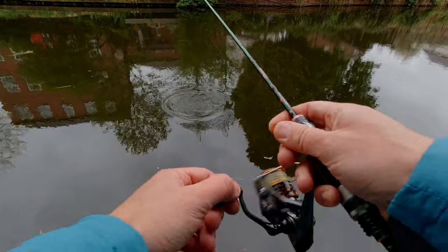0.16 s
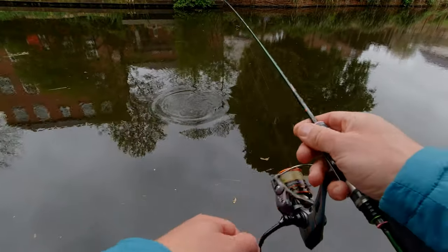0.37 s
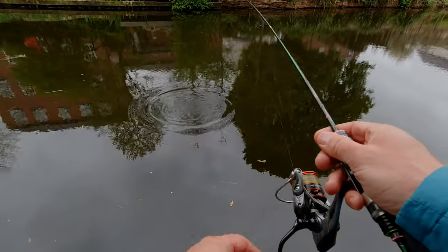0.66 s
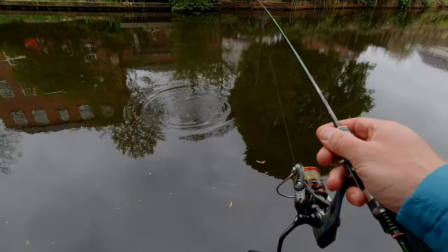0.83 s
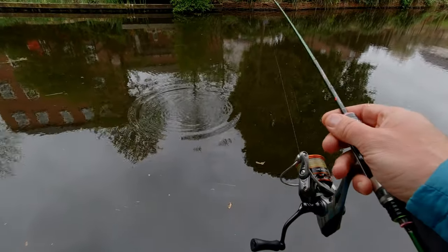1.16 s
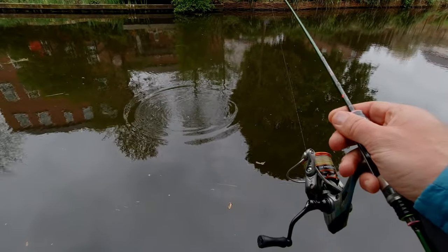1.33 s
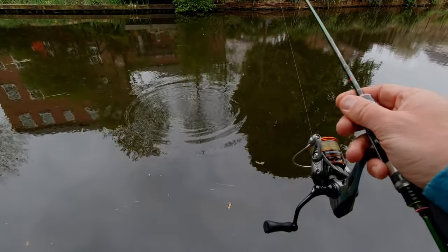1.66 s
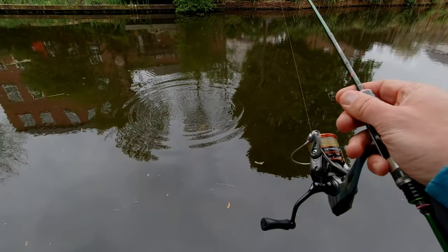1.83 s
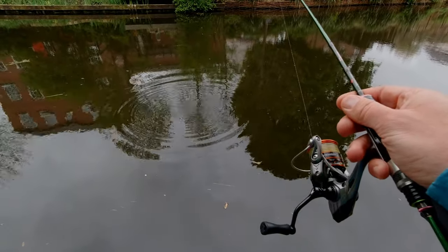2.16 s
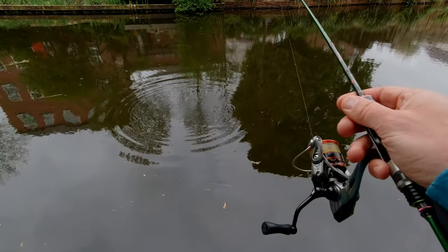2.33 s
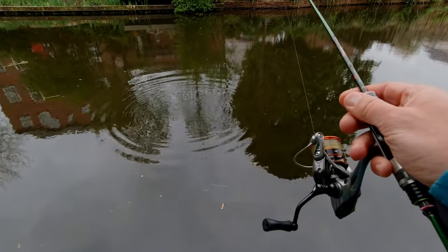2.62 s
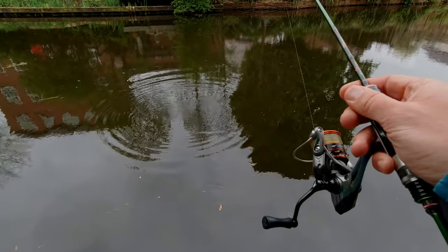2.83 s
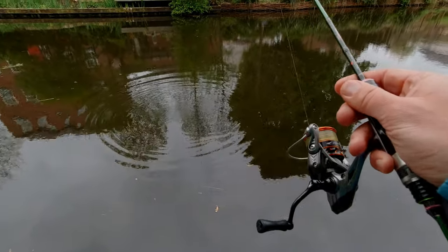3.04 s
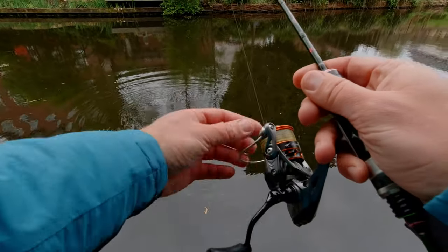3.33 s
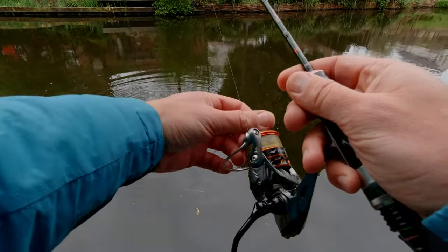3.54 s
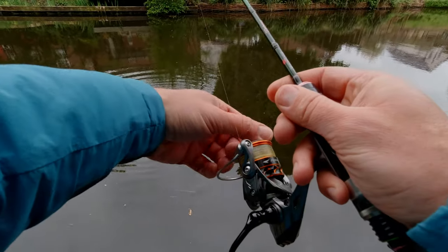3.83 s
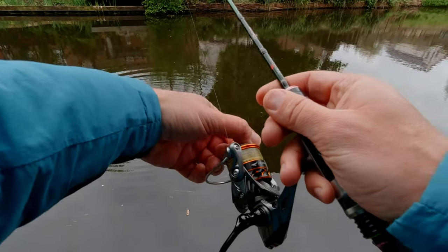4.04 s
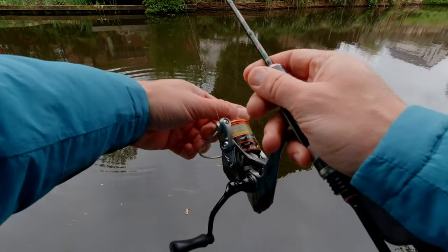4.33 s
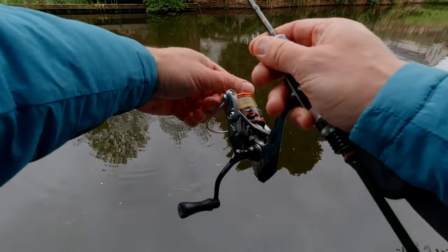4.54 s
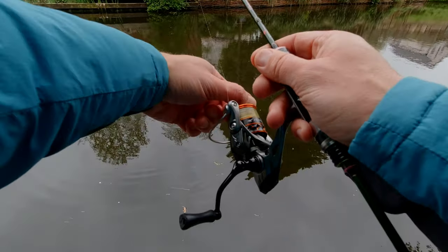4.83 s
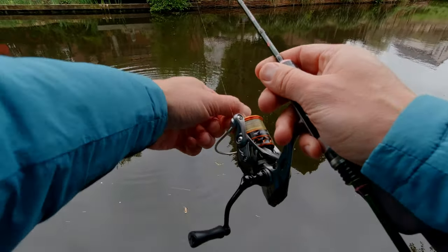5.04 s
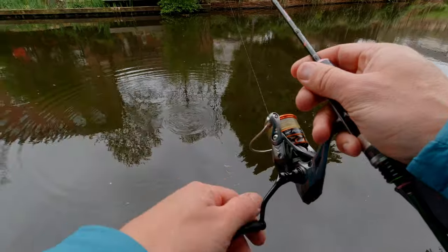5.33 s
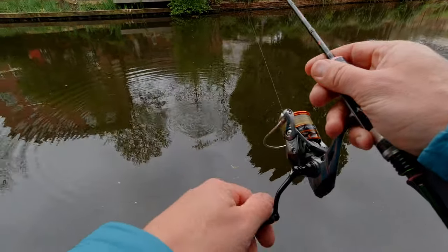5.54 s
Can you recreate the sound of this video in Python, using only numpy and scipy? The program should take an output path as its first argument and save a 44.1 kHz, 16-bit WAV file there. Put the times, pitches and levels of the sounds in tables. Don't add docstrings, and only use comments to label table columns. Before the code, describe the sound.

Bright reel clicks buzz briefly, then return more slowly, amid low wind buffeting, soft bumps, cloth rustle and birdsong beside a canal.

```python
import sys
import numpy as np
from scipy import signal
from scipy.fft import rfft, irfft
from scipy.io import wavfile
from scipy.ndimage import uniform_filter1d

SR = 44100
rng = np.random.default_rng(int(sys.argv[2]) if len(sys.argv) > 2 else 0)


def inscribe(sig):
    pcm = np.round(np.clip(np.atleast_2d(sig).T, -1, 1) * 32767)
    wavfile.write(sys.argv[1], SR, pcm.astype(np.int16))


def amplitude_ratio(level_db):
    exponent = np.asarray(level_db, float) / 20
    return 10 ** exponent


N = 250309
TIME = np.arange(N) / SR


def unit(x):
    return x / np.sqrt(np.mean(x ** 2))


def coloured(points):
    hz, db = np.transpose(points)
    bins = np.log(np.arange(N // 2 + 1) * SR / N + 1)
    shape_db = np.interp(bins, np.log(hz), db, left=-90)
    return unit(irfft(rfft(rng.standard_normal(N)) * amplitude_ratio(shape_db), N))


def walk(rate_hz):
    hold = int(SR / rate_hz)
    steps = np.repeat(rng.standard_normal(N // hold + 1), hold)
    return unit(uniform_filter1d(uniform_filter1d(steps, hold), hold)[:N])


def swell(peak_s, fade_s, level_db):
    squareness = 1.464
    return amplitude_ratio(2 * (level_db - 20 * (np.abs(TIME - peak_s) / fade_s) ** squareness))


def echoes(x, t60_s, gap_s):
    t = np.arange(40000) / SR
    onset = np.clip(t / gap_s, 0, 1) ** 2
    tail = rng.standard_normal(len(t)) * amplitude_ratio(-60 * t / t60_s) * onset
    return signal.fftconvolve(x, tail / np.sqrt(np.sum(tail ** 2)))[:N]


def add(out, start_s, piece):
    i = int(start_s * SR)
    out[i:i + len(piece)] += piece[:N - i]


def ring(hz, t60_s, level_db, rise_s, detune):
    t = np.arange(3000)[:, None] / SR
    pitch_chance, phase_chance = rng.standard_normal((len(hz), 2)).T
    phase = 2 * np.pi * (hz * (1 + detune * pitch_chance) * t + phase_chance)
    envelope = amplitude_ratio(level_db - 60 * t / t60_s) * (1 - np.exp(-(t / rise_s) ** 2))
    return np.sum(envelope * np.sin(phase), axis=1)


# pitch_hz, density_db (per Hz)
TOWN_SPECTRUM = [(40, -30), (60, -3), (140, -15), (400, -28.5), (800, -27.5), (1300, -35), (2600, -46),
                 (4500, -47), (8000, -61.5), (12600, -65), (13200, -90), (16500, -100)]


def town_hum():
    return coloured(TOWN_SPECTRUM) * amplitude_ratio(-52.5 + 0.35 + 1.1 * walk(5.25))


# pitch_hz, density_db (per Hz)
RUSTLE_SPECTRUM = [(300, -6.5), (800, 1.5), (2000, -3), (4000, -8.5), (8000, -15.5), (12600, -23),
                   (14500, -41.5)]
# peak_s, fade_s (to fall 20 dB), level_db
SLEEVES = [
    (.052, 0.05, -62),
    (.5, 0.3, -60.5),
    (1.1, 0.7, -65.5),
    (3.4, 0.5, -64),
    (4.0, 2.5, -67.5),
    (4.7, 0.3, -68),
    (5.25, 0.8, -64),
]


def rustle():
    leaves_db = -76
    grains = amplitude_ratio(1.5 * walk(150) + 1.2 * walk(25))
    power = amplitude_ratio(2 * leaves_db) + sum(swell(*move) for move in SLEEVES)
    return unit(coloured(RUSTLE_SPECTRUM) * grains) * np.sqrt(power)


def whistles(notes, wobble, flutter_db, attack_s):
    out, shake = np.zeros(N + SR), np.tile(walk(90), 2)
    for start_s, length_s, *hz, level_db in notes:
        u = np.linspace(0, 1, int(length_s * SR))
        bend = np.polyfit(np.linspace(0, 1, len(hz)), hz, len(hz) - 1)
        unsteady = 1 + wobble * shake[int(start_s * SR):][:len(u)]
        pitch_hz = np.polyval(bend, u) * unsteady
        breath = np.clip(np.minimum(u, 1 - u) * length_s / attack_s, 0, 1)
        tone = np.sin(2 * np.pi * np.cumsum(pitch_hz) / SR)
        add(out, start_s, np.sqrt(2) * amplitude_ratio(level_db) * breath * tone)
    return out[:N] * amplitude_ratio(flutter_db * walk(40))


# start_s, length_s, pitch_hz, level_db
HELD = [(.075, 0.05, 1500, -66), (.17, 0.216, 4600, -71), (0.399, 0.34, 1374, -71),
        (.445, 0.043, 2950, -60), (0.575, .05, 3700, -64), (.815, 0.29, 4013, -61),
        (0.927, 0.18, 3615, -61), (1.175, 0.23, 3496, -56.5), (1.27, 0.079, 3170, -56.5),
        (1.33, 0.18, 2684, -68), (1.42, 0.085, 2476, -73), (1.45, 0.15, 3530, -67.5),
        (1.53, 0.042, 2508, -58.5), (1.56, 0.014, 4320, -68), (1.799, 0.14, 3250, -65.5),
        (1.55, .07, 3560, -63), (2.045, 0.0615, 2810, -60.5), (2.869, 0.2, 2868, -55.5),
        (3.54, 0.201, 7720, -76), (3.80, .1, 7820, -82), (4.96, 0.21, 8840, -61), (5.635, .03, 4700, -62),
        (.5, .045, 3650, -66), (2.29, .08, 3700, -66)]
# start_s, length_s, start_hz, end_hz, level_db
SLURS = [(.26, 0.056, 3520, 2780, -65), (0.799, 0.03, 4720, 4140, -73), (0.966, 0.048, 3150, 2744, -57.5),
         (1.015, 0.023, 2710, 2300, -64), (1.2, 0.068, 2820, 3200, -65), (2.124, .03, 4060, 3250, -58.5),
         (1.63, .08, 3150, 2840, -69), (2.181, 0.2, 3009, 3152, -57.5), (2.535, 0.085, 7690, 6250, -59.5),
         (2.59, .08, 7600, 6300, -64), (2.775, .08, 7450, 6100, -63), (2.721, .085, 7460, 5960, -57),
         (2.785, .09, 2350, 2830, -65), (2.889, 0.096, 2455, 2710, -60), (4.715, .06, 8230, 9050, -63),
         (5.252, 0.02, 3600, 5190, -53), (5.275, 0.15, 4840, 4440, -53.5), (5.305, 0.03, 4400, 3180, -50),
         (5.45, .042, 3950, 3260, -48)]
# start_s, length_s, start_hz, end_hz, level_db
SAGS = [
    (.322, .115, 3640, 3150, -54.5),
    (1.058, .13, 3320, 2790, -59),
    (1.694, .097, 3590, 3040, -61),
]


def far_notes():
    notes = [(s, length_s, hz, hz, hz, db) for s, length_s, hz, db in HELD]
    for rows, middle in [(SLURS, .48), (SAGS, .7)]:
        for s, length_s, start_hz, end_hz, db in rows:
            middle_hz = start_hz + middle * (end_hz - start_hz)
            notes.append((s, length_s, start_hz, middle_hz, end_hz, db))
    return notes


# start_s, lowest_hz, first_db, second_db
PAIRS = [(2.862, 4464, -51.5, -50.5), (2.985, 4410, -49.5, -51.5), (3.114, 4415, -51, -49.5),
         (3.250, 4325, -48, -49), (3.385, 4313, -47.5, -52), (3.520, 4277, -48.5, -48.5),
         (4.031, 4383, -60.5, -52.5), (4.152, 4390, -55, -50.5), (4.285, 4410, -56.5, -49)]
SCOOP_HZ = [560, 210, 15, 30, 200]


def scooped_pairs():
    scoop_s, gap_s, second_depth = 0.058, 0.053, .74
    flick_s, flick_hz, flick_db = .008, 5700, -17
    notes = []
    for s, lowest_hz, *both_db in PAIRS:
        for k, db in enumerate(both_db):
            pitches_hz = lowest_hz + second_depth ** k * np.array(SCOOP_HZ)
            notes.append((s + k * gap_s, scoop_s, *pitches_hz, db))
        entry_hz = lowest_hz + SCOOP_HZ[0]
        middle_hz = (flick_hz + entry_hz) / 2
        notes.append((s - flick_s, flick_s, flick_hz, middle_hz, entry_hz, both_db[0] + flick_db))
    return notes


# start_s, top_hz, level_db
CHIPS = [(1.388, 3960, -68), (1.474, 3920, -68), (1.566, 3910, -67), (1.914, 3790, -60), (1.962, 3950, -58),
         (2.012, 4010, -58), (2.06, 4100, -62), (2.175, 4000, -66), (2.226, 3900, -64.5)]
CHIP_HZ = [-300, 0, -130, -700]


def chips():
    return [(s, 0.028, *(top_hz + np.array(CHIP_HZ)), db) for s, top_hz, db in CHIPS]


# start_s, level_db
HIGH_CALLS = [
    (3.693, -53.5),
    (3.880, -53.5),
]
# delay_s, length_s, start_hz, middle_hz, end_hz, level_db
HIGH_PARTS = [
    (0, 0.01, 5000, 6100, 7150, -6),
    (0.01, 0.027, 7070, 7340, 7130, -5),
    (0.042, 0.049, 6950, 6510, 6100, 0.5),
]


def high_calls():
    wall_s, wall_db = .048, -6
    return [(s + delay_s + k * wall_s, *shape, db + part_db + k * wall_db)
            for s, db in HIGH_CALLS for delay_s, *shape, part_db in HIGH_PARTS for k in range(2)]


# start_s, length_s, low_hz, high_hz, level_db
BUZZES = [(1.632, .22, 4050, 5300, -60), (2.39, 0.4, 3560, 3750, -54.5), (2.44, 0.38, 2980, 3260, -53.5),
          (1.93, 0.3, 2680, 3300, -58), (1.76, .2, 2900, 3600, -58.5), (5.257, .08, 3850, 5100, -48),
          (5.25, .12, 3150, 4150, -51), (5.276, .16, 4300, 4900, -48.5), (5.455, 0.13, 3330, 3950, -43.5),
          (5.44, 0.18, 3700, 4800, -57), (5.32, 0.15, 3600, 4400, -49), (5.46, 0.13, 3700, 4250, -51.5),
          (.45, 0.29, 4400, 5100, -63), (4.76, 0.16, 8450, 9250, -61.5)]


def buzzes():
    out, shake = np.zeros(N), walk(70)
    for start_s, length_s, low_hz, high_hz, level_db in BUZZES:
        span_hz = high_hz - low_hz
        sweeps_per_s = 40 + 19 * span_hz / 1000
        u = np.linspace(0, 1, int(length_s * SR))
        uneven = 1.6 * shake[int(start_s * SR):][:len(u)]
        sweep = np.sin(2 * np.pi * sweeps_per_s * u * length_s + uneven)
        pitch_hz = low_hz + span_hz * (1 + sweep) / 2
        envelope = amplitude_ratio(level_db - 2.5 * u) * np.clip(u / 0.035, 0, 1)
        add(out, start_s, envelope * np.sin(2 * np.pi * np.cumsum(pitch_hz) / SR))
    return out


def birds():
    clear = whistles(scooped_pairs() + chips() + high_calls(), .005, 1.2, .004)
    far = whistles(far_notes(), .015, 2, .008)
    harsh = buzzes()
    direct = amplitude_ratio(-2.5) * clear + amplitude_ratio(-4.5) * far + amplitude_ratio(-9) * harsh
    trees = echoes(amplitude_ratio(-5) * clear + amplitude_ratio(-5.5) * far + amplitude_ratio(-4) * harsh, .2, .004)
    fronts = echoes(amplitude_ratio(-10.5) * clear + amplitude_ratio(-8) * far + amplitude_ratio(-6) * harsh, .9, .035)
    return direct + trees + fronts


# peak_s, fade_s (to fall 20 dB), level_db, eddy_size (-.5 thud, 1 boom, 2 flap, 3 flutter)
GUSTS = [(0.01, 0.0054, -40, 1.3), (.08, 0.7, -34, -0.33), (.72, 0.21, -19.5, 0), (.86, .5, -27.5, .4),
         (1.002, 0.1041, -17.5, 0.7), (1.06, 0.18, -13.5, 0.2), (1.1, 0.19, -33, 2.2), (1.3, .22, -29, 1.5),
         (1.74, 0.12, -33, 1.8), (1.27, 0.19, -16, 0.2), (1.44, 0.12, -18.5, 0.06), (1.499, 0, -27.5, 1),
         (1.63, 0.07, -26.5, 1), (1.68, 0.5, -27, -0.9), (1.741, 0.16, -21.5, 0.4),
         (1.85, 0.45, -22, -0.07), (2.06, 0.26, -21.5, 0.5), (2.13, 0.43, -25.5, 0.5),
         (2.36, 0.37, -29.5, 1.2), (2.54, 0.13, -26, 0.8), (2.68, 0.15, -31, 2), (2.79, .09, -21, 1),
         (2.9, 0.21, -30, 1), (3.0, 0.1, -30, -0.9), (3.61, 0.0955, -25.5, 1.3), (3.665, 0.0354, -22.5, 1),
         (3.902, 0.0545, -21.5, 1.5), (3.941, 0.11, -26.5, 0), (4.36, 0.1, -36, 2.4),
         (4.37, 0.15, -32.5, -1.9), (4.66, 0.12, -26.5, 0.1), (4.77, 0.2, -36.5, 2),
         (4.79, 0.12, -27.5, -0.9)]
# time_s, level_db
BREEZE = [(0, -49.5), (.15, -75.5), (.4, -60), (.7, -49.5), (1.5, -45.5), (1.57, -65), (1.7, -54),
          (3.2, -48), (3.55, -39.5), (3.85, -40), (4.13, -45), (4.8, -42), (5.0, -48), (5.2, -41.5),
          (5.68, -47.5)]
WIND_EDGES_HZ = [20, 45, 100, 220, 500]
EDDY_SIZES = [-0.47, 0.98, 1.9647, 3.5]
BREEZE_SIZES_DB = [-7, -12, -1.5, -11.5]


def wind():
    bigger_db, smaller_db = -17.5, -12.5
    breeze_db = np.interp(TIME, *np.transpose(BREEZE))
    gusts = np.array([swell(*gust[:3]) for gust in GUSTS])
    sizes = np.array(GUSTS)[:, 3]
    out, puffs = 0, amplitude_ratio(2.1 * walk(21.954))
    for low, high, size, calm_db in zip(WIND_EDGES_HZ, WIND_EDGES_HZ[1:], EDDY_SIZES, BREEZE_SIZES_DB):
        eddy = coloured([(.7 * low, -25), (low, 0), (high, -11), (1.4 * high, -30),
                         (4 * high, -75), (20000, -140)])
        eddy = eddy / uniform_filter1d(eddy ** 2, int(2.5 * SR / low)) ** .35
        share_db = np.where(sizes > size, bigger_db * (sizes - size), smaller_db * (size - sizes))
        power = amplitude_ratio(2 * share_db) @ gusts + amplitude_ratio(2 * (breeze_db + calm_db))
        out = out + unit(eddy * puffs) * np.sqrt(power)
    return out


# start_s, pitch_hz, level_db, peak_s (to the strongest swing)
THUMPS = [(.0028, 122, -23, .008), (1.049, 44, -20, .02), (1.262, 46.5, -18.5, 0.019),
          (1.378, 39, -15.5, 0.023), (2.005, 43, -17.5, .022), (2.75, 30, -17.5, 0.017),
          (2.93, 23.5, -25.5, 0.051), (3.572, 23, -13, 0.021), (3.625, 19.8, -16.5, .022),
          (3.925, 17.6, -20.5, 0.021), (4.576, 31.2, -15.5, .024), (4.86, 28, -26, 0.021)]
# start_s, level_db, pitch_hz
SLAPS = [(0.691, -42, 250), (0.776, -45, 245), (0.904, -38, 218), (0.993, -33, 207), (1.171, -37, 207),
         (1.247, -33, 221), (1.352, -37, 207), (1.483, -43, 207), (1.725, -41, 261), (1.862, -46, 207),
         (1.984, -42, 213), (2.085, -39, 207), (2.184, -42, 231), (2.418, -42, 207), (2.504, -45, 240),
         (2.645, -36, 207), (2.72, -40, 248), (2.922, -41, 250), (3.115, -45, 234), (3.249, -46, 256),
         (3.363, -45, 218), (3.483, -39, 234), (3.538, -34, 253), (3.629, -36, 210), (3.732, -36, 215),
         (3.82, -38, 245), (4.032, -42, 210), (4.083, -41, 229), (4.261, -38, 275), (4.3, -42, 242),
         (4.349, -33, 288), (4.481, -42, 215), (4.613, -39, 264), (4.657, -37, 234), (4.713, -36, 250),
         (4.767, -37, 231), (4.827, -39, 242), (4.988, -49, 240), (5.178, -39, 250), (5.335, -41, 207)]


def thumps():
    out, t = np.zeros(N), TIME[:SR // 4]
    slaps = [(s, hz, db - 2, 1.1 / hz) for s, db, hz in SLAPS]
    for start_s, hz, level_db, peak_s in THUMPS + slaps:
        envelope = (t / peak_s * np.exp(1 - t / peak_s)) ** 2
        add(out, start_s, -amplitude_ratio(level_db) * envelope * np.sin(2 * np.pi * hz * t))
    return out


# start_s, level_db, pitch_hz, t60_s
KNOCKS = [
    (.003, -45, 420, .07),
    (.015, -45, 1100, .05),
    (.038, -46, 460, .1),
    (.040, -54, 2400, .11),
    (.051, -53, 1400, .06),
    (1.268, -56, 1700, .012),
    (3.885, -56, 1600, .012),
    (4.387, -47, 1300, .02),
    (4.822, -60, 4300, .04),
]


def knocks():
    out = np.zeros(N)
    spread = np.array([.55, .65, .8, .9, 1.0, 1.1, 1.25])
    for start_s, level_db, hz, t60_s in KNOCKS:
        add(out, start_s, ring(hz * spread, t60_s, level_db - 2.5, 0.00044, 0.062))
    return out


# start_s, peak_db
KNOB = [
    (4.8886, -31.5),
    (4.9576, -31),
    (5.025, -27),
    (5.0845, -28),
]
# pitch_hz, t60_s, level_db
KNOB_MODES = [(2980, 0.0039, -20), (5150, 0.0031, -3), (8880, 0.00337, -0.5), (10110, 0.0044, -3),
              (11860, 0.0049, -9), (14650, 0.0048, -8)]


def knob_notches():
    out = np.zeros(N)
    for start_s, peak_db in KNOB:
        notch = ring(*np.transpose(KNOB_MODES), 0.0004, 0.017)
        add(out, start_s, notch * amplitude_ratio(peak_db - 0.5) / np.abs(notch).max())
    return out


# start_s, rim_db, cup_db, spring_db
TICKS = [(0.3124, -40.0, -42, -45), (0.3444, -37.5, -46.0, -38), (0.363, -39.0, -44, -39),
         (0.3757, -41.0, -40.0, -40), (0.387, -41, -47.0, -36), (0.3954, -34, -53.0, -38.0),
         (0.4038, -32.5, -48, -44.0), (0.4114, -39, -43.0, -38.0), (0.4188, -37.0, -38, -42),
         (0.4257, -38.0, -35.0, -36.0), (0.4326, -40, -38.0, -40.0), (0.4393, -44.0, -40.0, -36.0),
         (0.4464, -44.0, -45.0, -39.0), (0.4535, -44.0, -40, -37.0), (0.4607, -39.0, -39.5, -37.0),
         (0.4687, -37, -42.0, -42.0), (0.4785, -37.0, -43.0, -39.0), (0.4896, -38, -39.0, -36.0),
         (0.503, -47.5, -38.0, -39), (0.5191, -48.0, -39.5, -41.0), (0.5363, -42.0, -46.0, -39.0),
         (0.552, -45.0, -43, -38.0), (0.5666, -41.0, -42.0, -35.0), (0.5785, -36.0, -41, -38.0),
         (0.5904, -39.0, -44.0, -40.0), (0.601, -45, -46, -40.0), (0.613, -36.0, -48.0, -43),
         (0.6268, -35.5, -48.0, -43.0), (0.6438, -39, -40.0, -40.5), (0.7058, -45.5, -39.0, -43.0),
         (1.4715, -47.5, -38.5, -42), (2.2934, -43.0, -41.5, -43.0), (2.3211, -35.5, -41.5, -42.0),
         (2.346, -36.5, -41.0, -44.5), (2.3685, -39.5, -41.0, -45.0), (2.3904, -41.0, -39.5, -44.0),
         (2.4139, -42.5, -39.0, -41.0), (2.4393, -44.0, -42, -42.0), (2.475, -46.0, -45, -39.0),
         (2.5108, -44.0, -39.0, -39.5), (2.5543, -42.0, -40.5, -43.0), (2.626, -37.5, -40.0, -48),
         (2.84, -38.0, -34.5, -50), (5.4338, -35.0, -32.5, -39)]
# pitch_hz, t60_s, level_db
SPOOL_MODES = [(4440, 0.0068, -23), (5550, 0.0071, 2.5), (6280, 0.0043, 1.5), (7196, 0.0071, -18),
               (8140, 0.0058, -7), (9066, 0.0062, 5), (9900, 0.003, 1.5), (11270, 0.0057, 6),
               (12800, 0.0061, 5.5), (14000, 0.0045, -28), (15000, 0.0073, 0)]
SPOOL_PART = [0, 0, 0, 2, 2, 1, 3, 3, 4, 4, 5]
PART_DB = [0, 0.5, -5, -2.5, -4, -7.5]
PART_DRIVER = [0, 1, 1, 2, 2, 2]
PART_SCATTER_DB = [0, 0, 3, 3, 3]
# time_s, upper_over_lower_db
RIM_TILT = [(.313, -1), (.364, 8), (.39, -4), (.42, -4), (.436, 11), (.46, -5), (.49, 7), (.52, -2),
            (.553, -2), (.566, 10), (.602, 11), (.613, -8), (.63, -5), (.644, 6), (.706, 8), (2.29, -4),
            (2.35, -11), (2.39, 3)]
RIM_SHARE = np.array([0, -.5, .5, 0, 0, 0, 0, 0, 0, 0, 0])


def drag_ticks():
    out = np.zeros(N)
    hz, t60_s, mode_db = np.transpose(SPOOL_MODES)
    snap = amplitude_ratio(-60 * TIME[:400] / 0.0057)
    for start_s, *drive_db in TICKS:
        scatter_db = PART_SCATTER_DB * rng.standard_normal(len(PART_SCATTER_DB))
        parts_db = np.array(drive_db)[PART_DRIVER] + PART_DB + np.append(scatter_db, 0)
        tilt_db = np.array(RIM_SHARE) * np.interp(start_s, *np.transpose(RIM_TILT), right=0)
        level_db = mode_db + 11 + parts_db[SPOOL_PART] + tilt_db
        add(out, start_s - .0003, ring(hz, t60_s, level_db, 0.00051, 0.013))
        scrape = np.diff(rng.standard_normal(402), n=2) / 3.4
        add(out, start_s, amplitude_ratio(np.mean(parts_db) + 11) * snap * scrape)
    return signal.sosfilt(signal.butter(6, 15900, fs=SR, output="sos"), out)


def reel():
    ticks = drag_ticks()
    out = ticks + knob_notches()
    add(out, .0082, amplitude_ratio(-18) * echoes(ticks, .008, .0003))
    body = amplitude_ratio(-21.5) * echoes(out, 0.11, 0.0011)
    far_bank = amplitude_ratio(-22.0) * echoes(out, .17, .012)
    return out + body + far_bank


def scene():
    background = town_hum() + rustle() + birds() + wind()
    return (background + thumps() + knocks() + reel())[None]


def band_limit(x):
    return signal.sosfilt(signal.butter(12, 16970, fs=SR, output="sos"), x)


def record(dry):
    opened = dry * np.clip(np.minimum(TIME, TIME[::-1]) / .002, 0, 1)
    rounded = .45 * np.tanh(opened / .45)
    top_cut = signal.ellip(8, .2, 60, 16450, fs=SR, output="sos")
    return band_limit(signal.sosfilt(top_cut, rounded))


dry = scene()
out = record(dry)
inscribe(out)
```